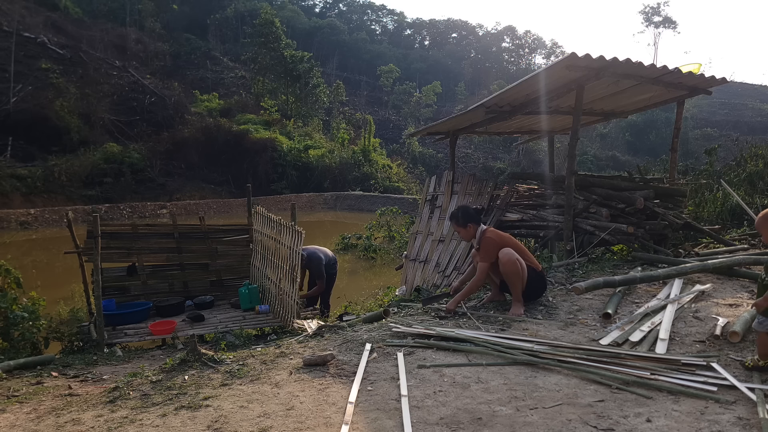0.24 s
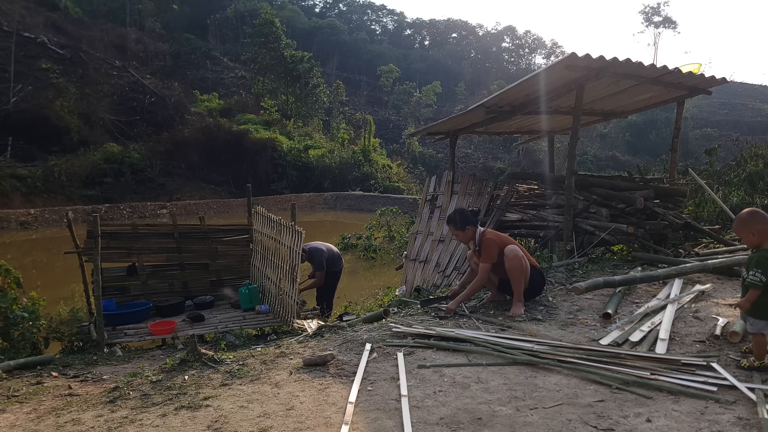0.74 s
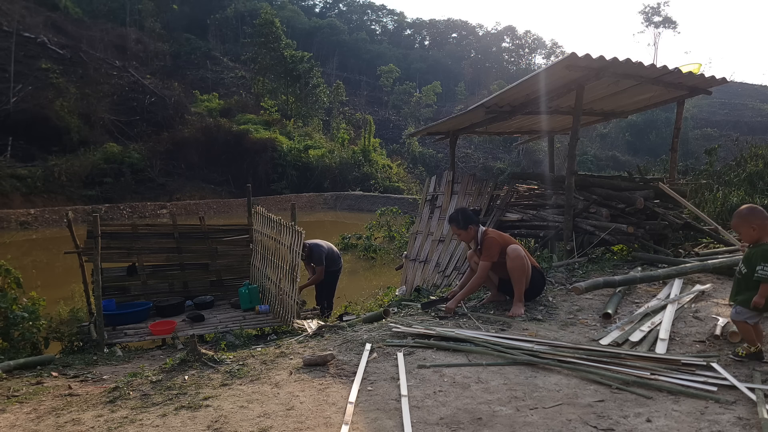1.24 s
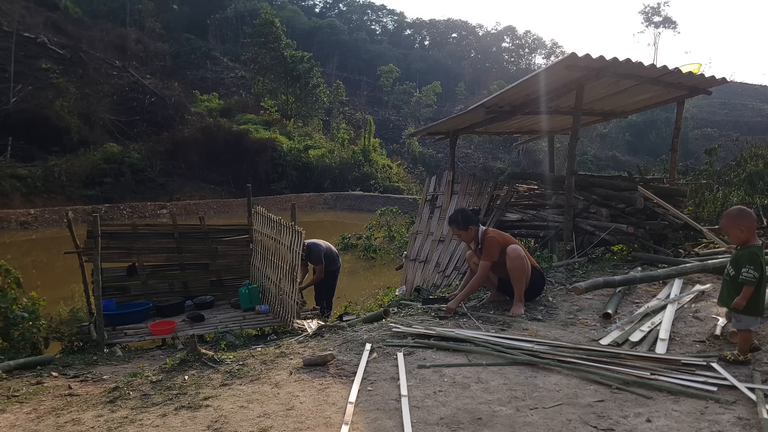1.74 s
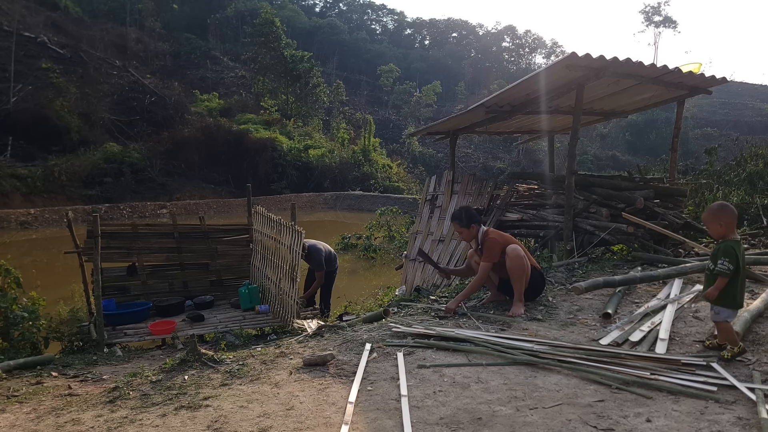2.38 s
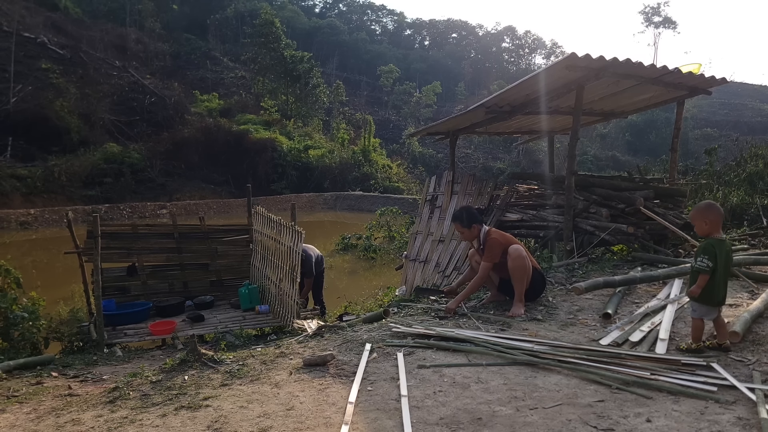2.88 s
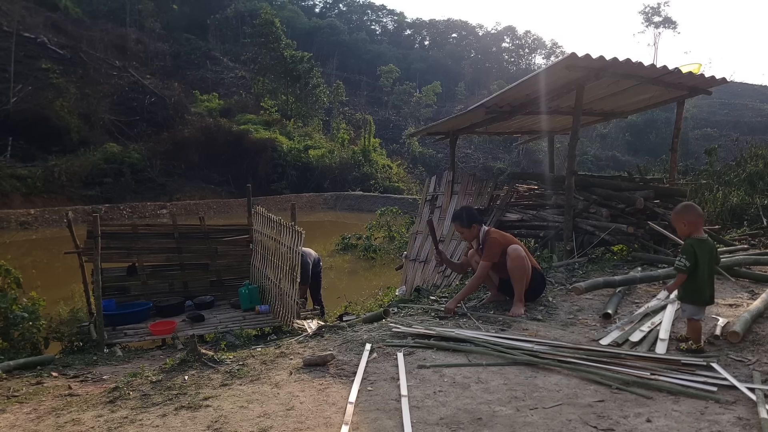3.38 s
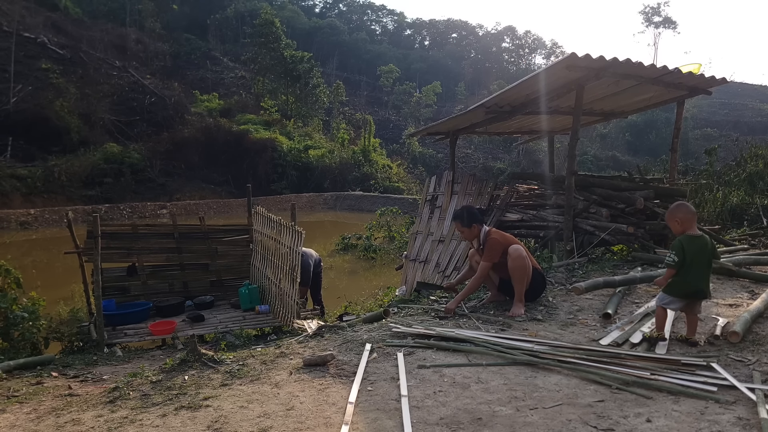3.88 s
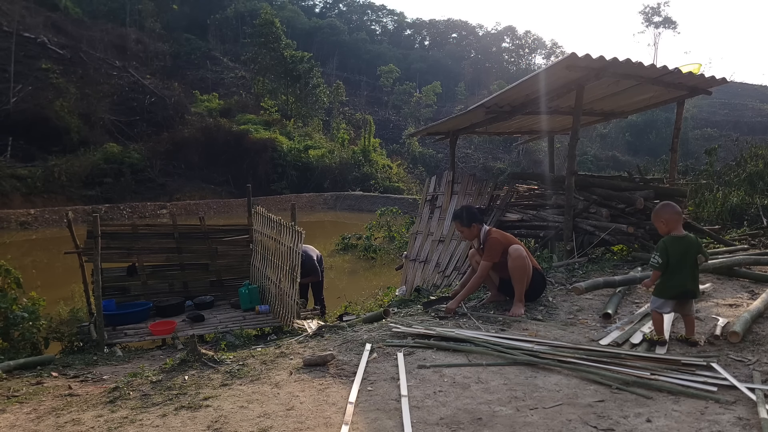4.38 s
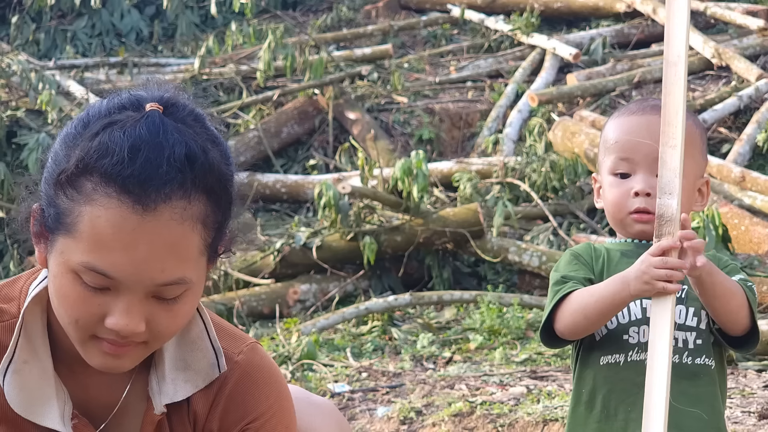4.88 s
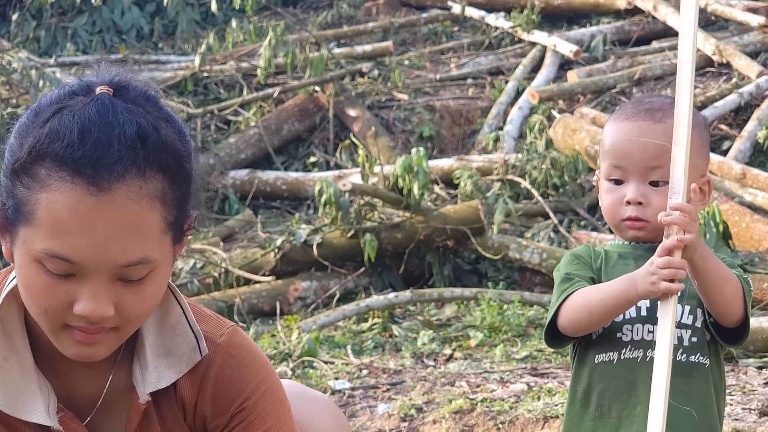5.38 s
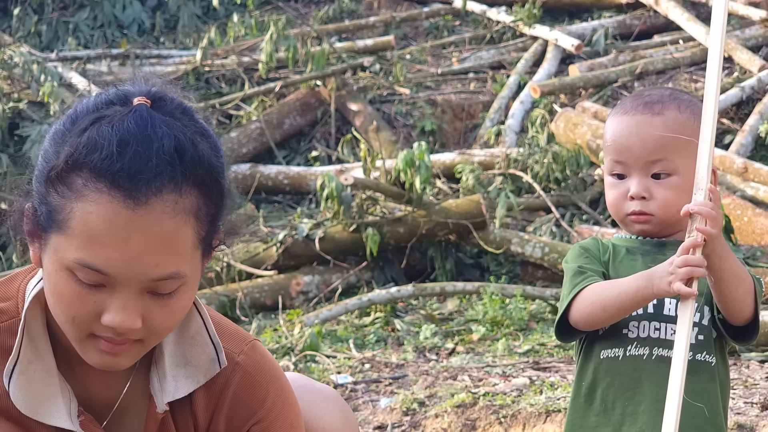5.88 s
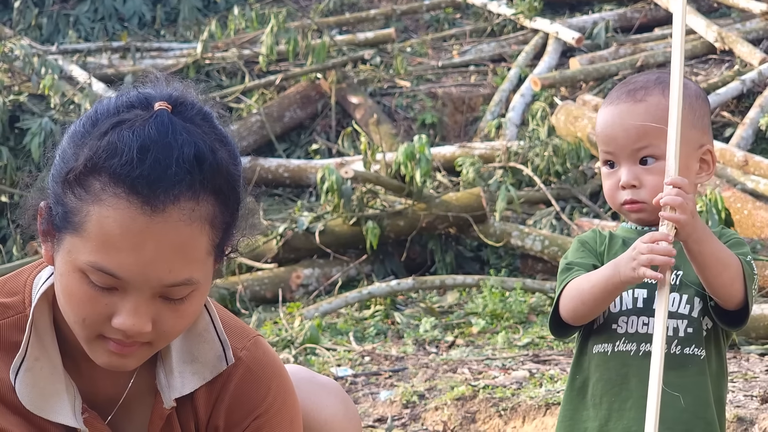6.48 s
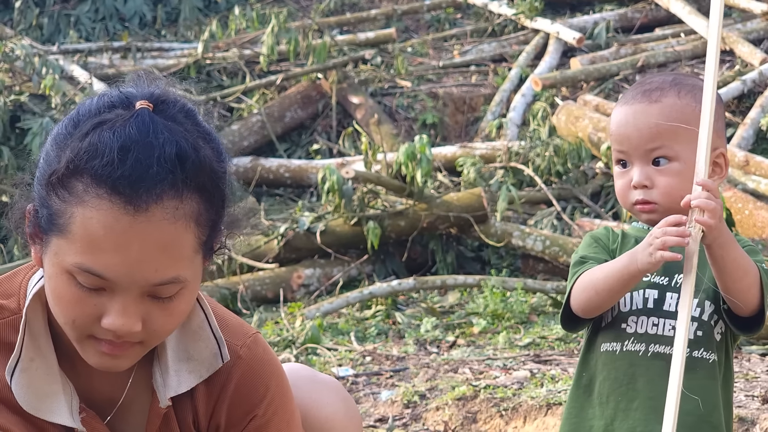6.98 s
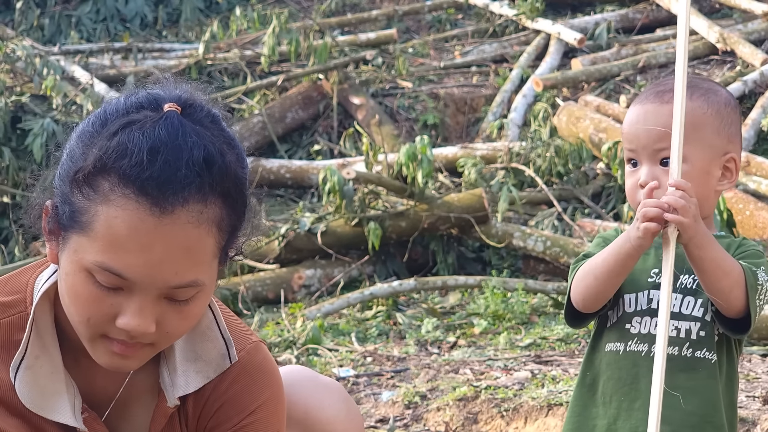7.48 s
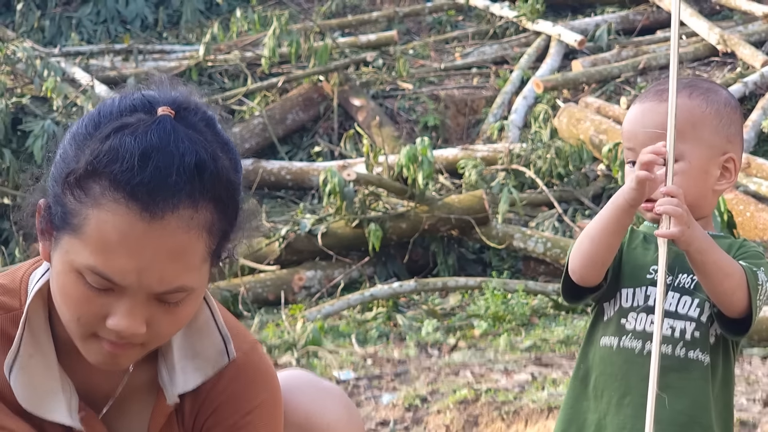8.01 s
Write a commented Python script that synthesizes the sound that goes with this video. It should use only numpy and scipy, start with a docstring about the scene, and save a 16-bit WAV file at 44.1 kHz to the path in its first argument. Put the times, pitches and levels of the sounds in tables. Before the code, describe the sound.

In a quiet rural yard, cicadas hiss softly, chicks peep and a bee buzzes faintly past. After a few light knocks, four blade strokes crack into bamboo a little way off, each with a low thump through the soil. The sound moves closer for a stretch of gentle pole handling and clearer peeps. A final splitting chop follows, with two quick knocks and a brief wind rumble on the microphone.

```python
"""Chopping bamboo by a shed

A heavy blade chops bamboo on the ground, some metres off; later the listener is closer. Each chop is
a burst of splitting fibres ringing the cane, a thud and a boom through the soil; shed and hillside
throw the blows back. Around it: knocks and rustle of poles, shuffling feet, chick peeps and a few hen
clucks, the wings of a passing bee, a throbbing cicada chorus and still country air with a few gusts."""
import sys
import numpy as np
from scipy import signal
from scipy.fft import rfft, irfft, next_fast_len
from scipy.io import wavfile
from scipy.ndimage import uniform_filter1d

SR = 44100
rng = np.random.default_rng(int(sys.argv[2]) if len(sys.argv) > 2 else 0)


def put_to_file(sound):
    """Save the sound as 16-bit audio at rate SR, in the file named by the first command-line argument."""
    columns = np.atleast_2d(sound).T  # one column per channel
    safe = np.clip(columns, -1, 1)
    whole_steps = np.round(safe * 32767)
    wavfile.write(sys.argv[1], SR, whole_steps.astype(np.int16))


N = 363818

# blade strokes: (time [s], crack level [dB], tilt [dB/octave], ring pitch [Hz], pan left [dB],
# split decay [s], thud level [dB], thud pitch [Hz], weight [dB])
CHOPS = [(1.7233, -11.5, -1, 4320, -0.5, 0.0054, -23, 215, -25),
         (2.6377, -13.5, -2.5, 4940, -1, 0.0028, -21.5, 211, -23.5),
         (3.5842, -13, 0.5, 6350, 0.5, 0.0025, -26.5, 215, -27),
         (4.2879, -13.5, 0.5, 2640, 0.5, 0.0041, -27, 199.5, -27.5),
         (8.0316, -13, -1.5, 2900, -1.5, 0.0037, -23.5, 204, -39.5)]
# the cane tears along its grain: (time [s], level [dB], decay [s])
TEARS = [(8.024, -23.5, 0.011), (8.046, -26, 0.033)]
# modes of the free cane and of a loose pole: (pitch [Hz], width [Hz], strength [MODE_STEP_DB])
CANE_MODES = [(1450, 6.7, 3), (2640, 74, -4), (2900, 52, -5.5), (3300, 40, -4), (4340, 11, -5.5),
              (4166, 14, -2.5), (4320, 38, 3), (4970, 160, -6.5), (5334, 140, -1), (5760, 67, 5),
              (6070, 40, -7), (6350, 21, -1.5), (6870, 17, -8), (7670, 100, -8.5), (8900, 40, -2),
              (9000, 17, -11), (10540, 370, -6.5), (10160, 110, -9.5)]
POLE_MODES = [(1254, 360, -4.5), (1482, 74, -10.5), (1669, 64, -7.5), (2070, 280, -7.5), (2790, 38, -10.5),
              (3257, 45, -1), (3800, 19, -8), (4080, 42, -11)]
# tone colour of chops and knocks: (frequency [Hz], gain [dB])
CHOP_EQ = [(500, -6.5), (900, -7), (1400, -1), (2000, -2.5), (2800, -1), (4600, 3), (7500, -0.5),
           (11000, -4.5), (15000, -3)]
KNOCK_EQ = [(450, -14), (750, -7), (1200, -5), (2000, -4), (2900, -2.5), (4600, 7.5), (7500, 2.5),
            (12500, -9.5)]
# the thud, retuned per chop, and the cane's air and wall: (pitch [Hz], level [dB], t60 [s], up to 0.5)
THUD_MODES = [(215, -0.5, 0.056), (294, 1, 0.049), (157, -26.5, 0.65), (240, -24, 0.41)]
HOLLOW_MODES = [(585, -5, 0.0088), (673, -0.5, 0.022), (773, -2.5, 0.057)]
# the boom arrives again and again: (delay [s], gain [dB], pitch [Hz], t60 [s])
BOOM_ARRIVALS = [(.004, -3.5, 108.3, 0.12), (0.019, 6, 91.4, 0.074), (0.071, -9.5, 99, 0.099),
                 (0.123, -19.5, 94, 0.19), (.160, -12, 85, .1), (0.196, -17.5, 96, 0.16)]
# poles and blade knock: (time [s], peak [dB], ring pitch [Hz], pan left [dB], tilt [dB/octave],
# decay [s])
KNOCKS = [(0.48, -34, 3400, -1.0, -1.5, 0.0087), (0.529, -48.5, 1650, 0.0, -1.5, 0.0074),
          (0.588, -49, 1970, -3, 2.5, 0.017), (0.708, -42, 1700, -1.0, -5, 0.0059),
          (0.789, -42, 1980, -2.0, -4.5, 0.0082), (0.892, -57.5, 1470, -4, -4, 0.0079),
          (2.123, -42, 3340, -2.5, -2, 0.005), (2.312, -57.5, 2450, -11, -7.5, 0.0037),
          (3.082, -35, 1025, -1.5, 1, 0.0044), (3.954, -45, 4100, -2, 0.5, 0.007),
          (4.042, -53, 4270, -1, 1, 0.0062), (4.423, -50.5, 1250, -2, 1, 0.011),
          (4.936, -37, 1720, -0.5, -0.5, 0.0093), (4.963, -44, 2020, -1, -7, 0.007),
          (5.006, -47, 2600, -2, -1.5, 0.0047), (5.174, -48, 3110, -2.5, -8, 0.0055),
          (5.283, -33, 4600, -1, -1, 0.0063), (5.316, -40.5, 1220, -0.5, -4, 0.0078),
          (5.338, -40.5, 1250, -1.0, -4, 0.0044), (5.366, -47.5, 1190, -1.0, -1, 0.007),
          (5.395, -37, 5290, -0.5, -3, 0.0078), (5.611, -43, 3580, -0.5, -4.5, 0.0076),
          (5.737, -48, 3280, 0.5, -3.5, 0.0052), (6.169, -54, 1060, -3, -4.5, 0.0063),
          (6.224, -40, 5330, 1, -2.5, 0.0091), (6.512, -50, 1230, 1.5, 2, 0.007),
          (7.297, -52.5, 1230, -3, -3.5, 0.0084), (7.339, -51.5, 1140, -0.5, -3.5, 0.007),
          (7.403, -53.5, 2120, -2, -7.5, 0.005), (7.614, -45, 1410, 0.0, 0, 0.0027),
          (8.105, -29.5, 2800, -2, -2.5, 0.0057), (8.197, -30.5, 2920, -1.5, -2, 0.0052)]
# soft thumps on the ground: (time [s], level [dB], pitch [Hz])
THUMPS = [(.819, -50.5, 167), (1.083, -51, 184), (2.126, -52, 163), (2.314, -50.5, 131),
          (3.081, -37.5, 150.7), (3.954, -52, 148.4), (4.931, -51.5, 393), (5.326, -49, 168),
          (5.442, -53.5, 370), (5.711, -53, 266), (5.903, -55, 230), (6.231, -54.5, 181), (6.7, -53.5, 94),
          (6.952, -54.5, 79.5), (7.199, -56, 403), (8.04, -24.5, 194), (8.08, -32, 215), (8.2, -41.5, 215)]
# handling faders: (time [s], poles [dB], leaves [dB])
HANDLING = [(0, -74.5, -72), (.45, -73.5, -71.5), (.7, -71, -65.5), (1.1, -75, -71.5), (3, -75.5, -72.5),
            (4.79, -74, -72), (4.805, -70.5, -61.5), (4.97, -62.5, -57), (5.16, -63.5, -60),
            (5.38, -56.5, -62), (5.53, -63.5, -61), (5.9, -63, -66), (6.7, -74.5, -69), (7, -73.5, -67.5),
            (7.32, -68.5, -68), (7.56, -77, -66.5), (7.9, -81, -72.5), (8.1, -57.5, -44.5),
            (8.25, -63, -65)]
# swells of dragged poles, feet, the bee's turns and gusts: (centre [s], length [s], level [dB])
SCRAPES = [(.625, .13, -60), (.91, .045, -65), (2.8, .05, -68), (3.175, .04, -68), (3.255, .04, -67),
           (4.78, .05, -66), (5.21, .06, -62), (5.75, .3, -66), (6.15, .12, -68), (7.375, .09, -64)]
SHUFFLES = [(.935, .04, -67), (3.29, 0.055, -73), (3.41, 0.18, -65), (5.0, 0.16, -64.5),
            (5.36, 0.28, -62.5), (7.35, .12, -73), (7.48, 0.035, -62.5)]
BEE_TURNS = [(.15, 0.17, -72), (.33, 0.22, -67), (.59, 0.3, -68), (.87, .1, -68), (1.14, .14, -62),
             (1.36, 0.36, -69)]
GUSTS = [(2.43, .35, -58), (5.0, 0.8, -70), (8.095, .11, -34.5)]
# chick peeps and, near 1500 Hz, a few hen clucks:
# (time [s], length [s], top pitch [Hz], end pitch [Hz], level [dB])
CHICKEN_CALLS = [(.07, .05, 1610, 1385, -68.5), (0.087, .085, 2900, 2170, -73), (.28, .07, 1530, 1430, -72),
                 (0.928, .14, 3100, 2000, -72), (1.323, 0.052, 2650, 1980, -72),
                 (1.434, 0.038, 1560, 1470, -67), (1.621, 0.071, 2990, 2070, -65.5),
                 (1.92, .067, 2870, 1910, -72), (2.194, 0.18, 3630, 2000, -67.5),
                 (2.809, .11, 3176, 2000, -70), (3.354, 0.09, 3170, 2170, -68),
                 (3.799, 0.053, 1492, 1370, -68.5), (3.991, 0.11, 3180, 2000, -72.5),
                 (5.086, 0.049, 2330, 1840, -54.5), (5.461, .08, 2167, 1730, -57),
                 (5.551, .19, 3800, 3130, -59), (5.642, 0.071, 2253, 1720, -61),
                 (5.801, 0.083, 2480, 1745, -60.5), (5.931, 0.031, 2340, 1740, -63),
                 (6.289, 0.028, 2250, 2000, -64), (7.125, .045, 2310, 1820, -65.5),
                 (7.229, 0.056, 2140, 1750, -62), (7.404, 0.034, 2340, 1620, -59),
                 (7.474, 0.043, 2880, 2600, -60.5), (7.759, 0.028, 2340, 1990, -62.5),
                 (7.891, 0.044, 2360, 1760, -63.5)]
# paths of a call through the scrub: (delay [s], gain [dB])
SCRUB_PATHS = [(0, 0), (.006, -9), (.014, -13), (.027, -16)]
# the bee's flight: (time [s], wing beat [Hz], level [dB])
BEE_FLIGHT = [(0, 158, -78), (.2, 170, -73), (.45, 156, -75.5), (.6, 171, -66), (.8, 160, -76.5),
              (1.0, 153, -74), (1.2, 165, -73), (1.35, 163, -73), (1.55, 150, -86), (1.7, 152, -79)]
# wing overtones: (harmonic number, gain [dB])
BEE_OVERTONES = [(2, -3), (3, -35), (4, -10.5), (5, -16)]
# colours of the noise layers: (frequency [Hz], relative density [dB])
WOOD_SPECTRUM = [(350, -26.5), (600, -3), (900, -1.5), (1200, -2.5), (1700, -3.5), (2300, -6),
                 (3200, -29.5)]
SOIL_SPECTRUM = [(250, -6), (420, 0), (650, 1.5), (900, -8.5), (1500, -14)]
LEAF_SPECTRUM = [(1500, -20), (2200, -3.5), (3000, 2.5), (4000, -1.5), (5500, -1), (6800, -1), (8000, -33)]
SIZZLE_SPECTRUM = [(7000, -35.5), (8500, 6), (10000, -2.5), (11500, -5), (14500, 1), (16000, -4)]
CICADA_SPECTRUM = [(2530, -54.5), (4300, -26), (4930, -17.5), (5420, -11.5), (6170, -20), (6350, -17),
                   (6730, -20.5), (6980, -2.5), (7450, 2.5), (8040, -1.5), (8920, -12.5), (9220, -22.5),
                   (10200, -27), (13300, -58), (22000, -120)]
AIR_SPECTRUM = [(24, -35.5), (40, 1.5), (173, -0.5), (269, -0.5), (324, -1.5), (564, 1.5), (642, -7.5),
                (719, -5), (983, -15), (1200, -11), (1560, -32.5), (2640, -120)]
GUST_SPECTRUM = [(15, 12), (35, 3), (60, -2.5), (120, -28)]
# reverb by band, levels relative: (band [Hz], scatter [dB], t60 [s], bank [dB], hillside [dB], t60 [s])
REVERB_BANDS = [(324, -2, .12, -23.5, -32, 0.73), (965, -4.5, 0.13, -52, -52, 0.41),
                (2000, -8.5, 0.16, -48.5, -36.5, 0.28), (4220, -15, 0.13, -45, -43.5, 0.48),
                (7900, -4, .09, -32, -31, 0.74), (12900, -1.5, 0.069, -32, -43, .6)]
# direct sound at the two microphone ports: (frequency [Hz], left phase lead [rad])
PORT_PHASE = [(0, 0), (900, 0.4), (4500, -2.09), (7000, -2), (10000, 1), (13000, 1.9), (16400, 2.5)]
# stereo image of the noise layers: (frequency [Hz], left-right correlation [0..1])
STEREO_LIKENESS = [(60, 0.17), (130, 0.67), (300, .5), (700, 0.18), (1400, 0), (16000, 0)]

CLOSER_S = 4.8  # the listener is closer from here on
MODE_STEP_DB = 0.86
SHED_DELAY_S, BANK_DELAY_S, BANK_SPREAD_S = .0072, 0.069, 0.015
BLOW_SAMPLES = 2048
BLOW_HZ = np.arange(BLOW_SAMPLES // 2 + 1) * SR / BLOW_SAMPLES
TIME = np.arange(N) / SR


def chops(damping_hz=45):
    """The blade splits and tears the cane, damped by hand and soil; it yields with a hollow thud."""
    out = np.zeros((2, N))
    held_modes = [(hz, width + damping_hz, strength) for hz, width, strength in CANE_MODES]
    cane = resonances(BLOW_HZ, held_modes, ring_db=-1) * undb(on_log(BLOW_HZ, CHOP_EQ))
    hollow = struck(HOLLOW_MODES, rise_s=0.000094)
    for s, db, tilt_db, ring_hz, pan_db, split_s, thud_db, thud_hz, weight_db in CHOPS:
        bite = resonances(BLOW_HZ, [(ring_hz, 450, 0)], ring_db=2.5)
        add(out, s, crack(cane * bite, db, tilt_db, pan_db, split_s))
        tuned = [(hz * thud_hz / THUD_MODES[0][0], level, t60) for hz, level, t60 in THUD_MODES]
        thud = undb(thud_db) * struck(tuned, rise_s=0.00059)
        add(out, s + .0015, thud + undb(weight_db - 3.5) * hollow)  # just after the edge bites
    for s, db, tear_s in TEARS:
        add(out, s, crack(cane, db, tilt_db=-1.5, pan_db=-0.66, decay_s=tear_s))
    return out


def crack(body, db, tilt_db, pan_db, decay_s, shed_db=-0.3):
    """Fibres snap in a dying burst that rings the body; the shed slaps it straight back."""
    t = np.arange(BLOW_SAMPLES) / SR
    snaps = rng.standard_normal((4, BLOW_SAMPLES)) * undb(2.0 * rng.exponential(size=BLOW_SAMPLES))
    snaps *= np.exp(-t / decay_s) * (1 - np.exp(-t / 0.00024))
    slap = undb(shed_db) * np.roll(snaps[1], int(SHED_DELAY_S * SR))
    burst = snaps[0] + 0.5 * snaps[2:] + slap  # centre, stereo width, shed
    tilt = undb(tilt_db * np.log2(np.clip(BLOW_HZ, 500, 16000) / 1000))
    low_cut = BLOW_HZ ** 2 / (BLOW_HZ ** 2 + 350 ** 2)
    fade = np.cos(np.pi / 2 * np.arange(BLOW_SAMPLES) / BLOW_SAMPLES)
    blow = np.roll(irfft(rfft(burst) * tilt * low_cut * body), 32) * fade
    loudest_rms = np.sqrt(uniform_filter1d(np.mean(blow ** 2, axis=0), size=176).max())  # over 4 ms
    return blow / loudest_rms * undb(db + np.array([[pan_db], [-pan_db]]) / 2)


def ground_boom():
    """Each chop's weight rolls through the soil in low waves that arrive from all sides."""
    out, port_phase = np.zeros((2, N)), np.array([[.4], [-.4]])
    for s, *_, weight_db in CHOPS:
        for delay, gain_db, hz, t60 in BOOM_ARRIVALS:
            add(out, s + delay, undb(weight_db + gain_db) * ring(hz, t60, 0.0084, port_phase))
    return out


def knocks(crest_db=4):
    """Poles and blade bump together; each contact favours its own pitch in the pole."""
    out = np.zeros((2, N))
    pole = resonances(BLOW_HZ, POLE_MODES, ring_db=10) * undb(on_log(BLOW_HZ, KNOCK_EQ))
    for s, peak_db, ring_hz, pan_db, tilt_db, decay_s in KNOCKS:
        spot = resonances(BLOW_HZ, [(ring_hz, ring_hz / 5, 0)], ring_db=7.5)
        add(out, s, crack(pole * spot, peak_db - crest_db, tilt_db, pan_db, decay_s, shed_db=-3.5))
    return out


def thumps():
    """The soil answers a soft bump with a pair of short, low tones."""
    out = np.zeros(N)
    for s, db, hz in THUMPS:
        add(out, s, undb(db) * (ring(hz, .075, 0.0026) + 0.45 * ring(hz * 1.22, .075, .004)))
    return out


def rustle(chop_tail_db=-55, chop_tail_t60=0.58):
    """Poles rub and ring, feet scuff, leaves stir; a hissy reverberant tail dies after each chop."""
    wood_db, leaf_db = curves(HANDLING)
    flutter, chop_tails = walk(30), np.zeros(N)
    for s, *_ in CHOPS:
        add(chop_tails, s, undb(chop_tail_db - 60 * TIME[:SR] / chop_tail_t60))
    rub = undb(wood_db + 2.7 * walk(60)) * hiss(WOOD_SPECTRUM, grain_db=4, modes=POLE_MODES, ring_db=7.5)
    drag = swells(SCRAPES) * undb(1.5 * walk(90))
    drag = drag * hiss(WOOD_SPECTRUM, grain_db=1.5, modes=POLE_MODES[::3], ring_db=30)
    feet = swells(SHUFFLES) * undb(2.4 * flutter) * hiss(SOIL_SPECTRUM, grain_db=4)
    leaves_and_tails = (undb(leaf_db) + chop_tails) * undb(2 * flutter) * hiss(LEAF_SPECTRUM, grain_db=3)
    # the top end partly rides the leaf fader and lifts when close
    sizzle_db = -73 + 0.64 * (leaf_db - leaf_db[0]) + 2 * (TIME > CLOSER_S)
    sizzle = undb(sizzle_db + 1.7 * flutter) * hiss(SIZZLE_SPECTRUM, grain_db=3)
    return rub + drag + feet + leaves_and_tails + sizzle


def chickens():
    """Chick peeps and a few lower hen clucks: wobbling, falling near-sines scattered by the scrub."""
    out, wobble = np.zeros((2, N)), walk(220)
    for s, length, top_hz, end_hz, db in CHICKEN_CALLS:
        progress = np.linspace(0, 1, int(length * SR))
        shake = wobble[int(s * SR):][:len(progress)]
        hz = top_hz - (top_hz - end_hz) * progress ** 1.5  # holds, then falls ever faster
        phase = phase_of(hz * (1 + .017 * shake)) + rng.uniform(-.8, .8, (2, 1))
        call = undb(db + 3.5 * shake[::-1]) * np.sin(np.pi * progress) ** .6 * np.sin(phase)
        for delay, gain_db in SCRUB_PATHS:
            add(out, s + delay, undb(gain_db) * call)
    return out


def bee():
    """Wing beats buzz in unsteady overtones; the lowest tone swells as the bee turns."""
    hz, db = curves(BEE_FLIGHT)
    phase = phase_of(hz * (1 + 0.0069 * walk(29.4)))
    fade_out = np.clip((BEE_FLIGHT[-1][0] - TIME) / .05, 0, 1)
    overtones = sum(undb(db + gain_db + 3 * walk(12)) * np.sin(k * phase) for k, gain_db in BEE_OVERTONES)
    return fade_out * overtones + swells(BEE_TURNS) * np.sin(phase)


def cicadas(throb_hz=63, throb_depth=.12):
    """The chorus blurs into a high, throbbing hiss, a touch softer once the work is close."""
    throb = 1 + throb_depth * np.sin(phase_of(throb_hz * (1 + 0.027 * walk(0.94))))
    level_db = -55.5 - 1.5 * (TIME > CLOSER_S) + .5 * walk(9.6)
    return undb(level_db) * throb * hiss(CICADA_SPECTRUM)


def air():
    """A low bed of still air, with gusts rumbling on the microphone ports."""
    return undb(-73.5 + 0.33 * walk(7.4)) * hiss(AIR_SPECTRUM) + swells(GUSTS) * hiss(GUST_SPECTRUM)


def surroundings():
    """The place answers a click: direct sound, near scatter, a bank of earth, the far hillside."""
    t, hz = TIME[:SR], np.arange(SR // 2 + 1.)
    out, centres = np.zeros((2, SR)), np.array(REVERB_BANDS)[:, 0]
    for centre, near_db, near_t60, bank_db, hill_db, hill_t60 in REVERB_BANDS:
        share = on_log(hz, list(zip(centres, centres == centre)))
        band = irfft(rfft(rng.standard_normal((2, SR))) * np.sqrt(share))
        bank = undb(bank_db) * np.exp(-((t - BANK_DELAY_S) / BANK_SPREAD_S) ** 2)
        envelope = undb(near_db - 60 * t / near_t60) + bank + undb(hill_db - 60 * t / hill_t60)
        out += band * envelope / 20 * (t > .002)
    phase_gap = np.interp(hz, *np.transpose(PORT_PHASE))
    direct = irfft(np.exp(.5j * np.outer([1, -1], phase_gap)))
    out += np.roll(direct, 32, axis=1)
    return out[:, :SR * 3 // 4]


def hiss(spectrum, grain_db=0., modes=(), ring_db=0.):
    """Coloured stereo noise at rms 1; grain makes it gritty, modes make it ring."""
    size = next_fast_len(N)
    hz = np.arange(size // 2 + 1) * SR / size
    grit = undb(grain_db * np.minimum(rng.exponential(size=size), 8)) if grain_db else 1
    colour = undb(on_log(hz, spectrum)) * (hz > spectrum[0][0]) * (hz < spectrum[-1][0])
    mid, side = rfft(rng.standard_normal((2, size)) * grit) * colour
    alike = on_log(hz, STEREO_LIKENESS)
    pair = mid * np.sqrt(1 + alike) + np.array([[1], [-1]]) * side * np.sqrt(1 - alike)
    x = irfft(pair * resonances(hz, modes, ring_db), size)[:, :N]
    return x / x.std()


def resonances(hz, modes, ring_db):
    """Frequency response of a body: resonant peaks over a flat base."""
    return 1 + sum(undb(ring_db + MODE_STEP_DB * strength) / (1 + 2j * (hz - pitch) / width)
                   for pitch, width, strength in modes)


def struck(modes, rise_s):
    """All modes of a body ring out after one blow."""
    out = np.zeros(SR // 2)
    for hz, db, t60 in modes:
        tone = ring(hz, min(t60, .5), rise_s)
        out[:len(tone)] += undb(db) * tone
    return out


def ring(hz, t60, rise_s, phase=0.):
    """One mode dies away after a soft push."""
    t = np.arange(int(t60 * SR)) / SR
    return np.sin(2 * np.pi * hz * t + phase) * undb(-60 * t / t60) * (1 - np.exp(-t / rise_s))


def swells(table):
    """A fader that rises and falls smoothly once per row."""
    out = np.zeros(N)
    for s, length, db in table:
        add(out, s - length / 2, undb(db) * np.hanning(int(length * SR)))
    return out


def walk(rate_hz):
    """Smooth random drift with a spread of 1."""
    hold = int(SR / rate_hz)
    steps = np.repeat(rng.standard_normal(N // hold + 1), hold)
    drift = uniform_filter1d(uniform_filter1d(steps, hold), hold)[:N]
    return drift / drift.std()


def curves(table):
    """Automation lanes, one for each column after the time."""
    s, *columns = np.transpose(table)
    return [np.interp(TIME, s, column) for column in columns]


def on_log(hz, table):
    """Read (frequency [Hz], value) rows on a log-frequency axis."""
    points_hz, values = np.transpose(table)
    return np.interp(np.log(hz + 1), np.log(points_hz), values)


def phase_of(hz):
    """Running phase of a gliding pitch."""
    return 2 * np.pi * np.cumsum(hz) / SR


def undb(db):
    """Gain of a level in dB."""
    return 10 ** (np.asarray(db) / 20)


def add(out, s, x):
    """Mix x in from time s."""
    i = int(s * SR)
    out[..., i:i + x.shape[-1]] += x[..., :N - i]


def scene():
    """Blows and chickens echo off the surroundings; the other layers are mixed straight in."""
    send = chops() + knocks() + thumps() + chickens()
    echoed = signal.fftconvolve(send, surroundings(), axes=1)[:, :N]
    return echoed + ground_boom() + bee() + rustle() + cicadas() + air()


def record(dry):
    """The microphone drops the deepest bass, clips at full scale and cuts the very top."""
    low_cut = signal.butter(2, 35, "high", fs=SR, output="sos")
    high_cut = signal.ellip(10, .2, 60, 16100, fs=SR, output="sos")
    return signal.sosfilt(high_cut, np.clip(signal.sosfilt(low_cut, dry), -1, 1))


dry = scene()
out = record(dry)
put_to_file(out)
```